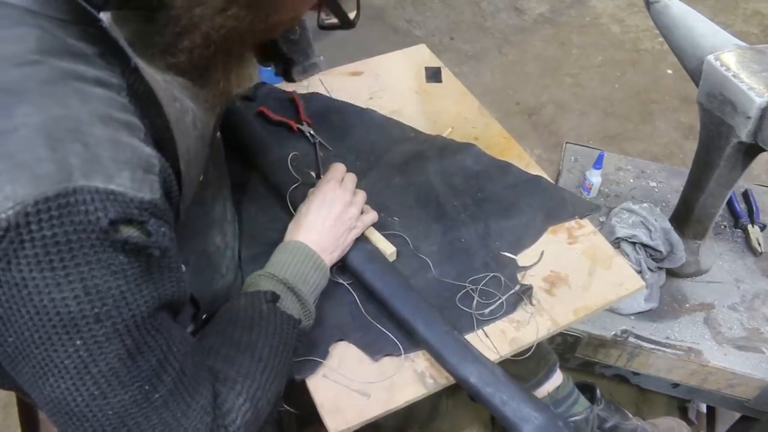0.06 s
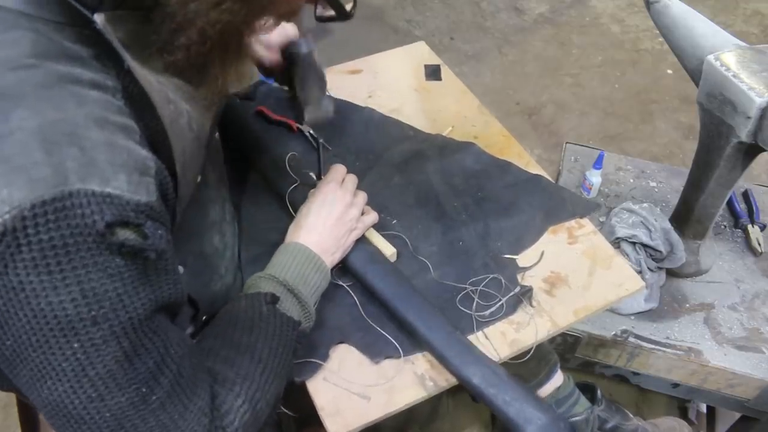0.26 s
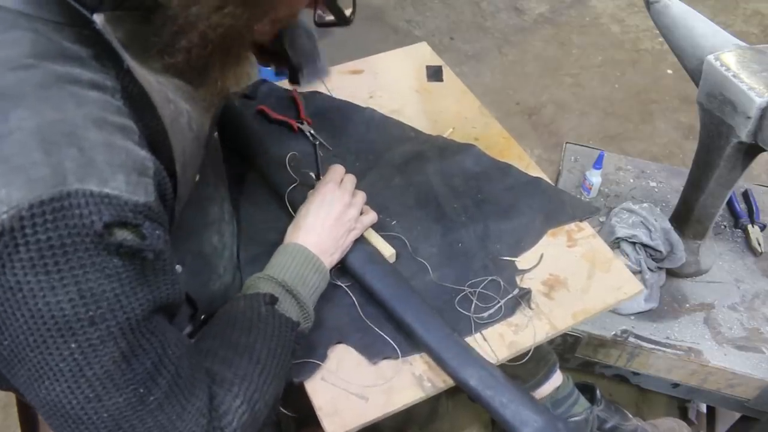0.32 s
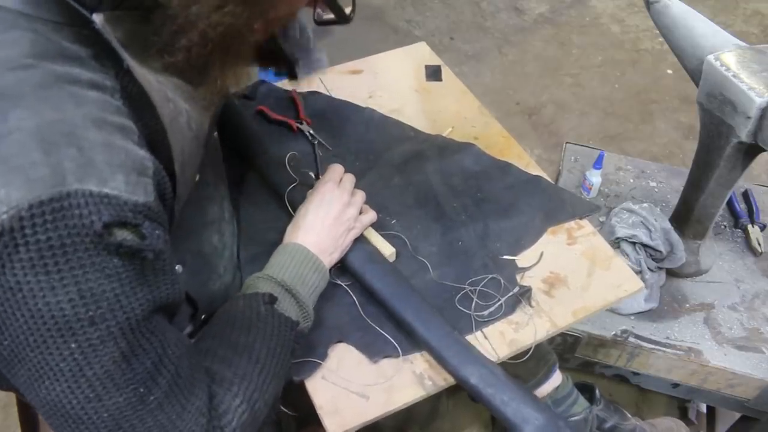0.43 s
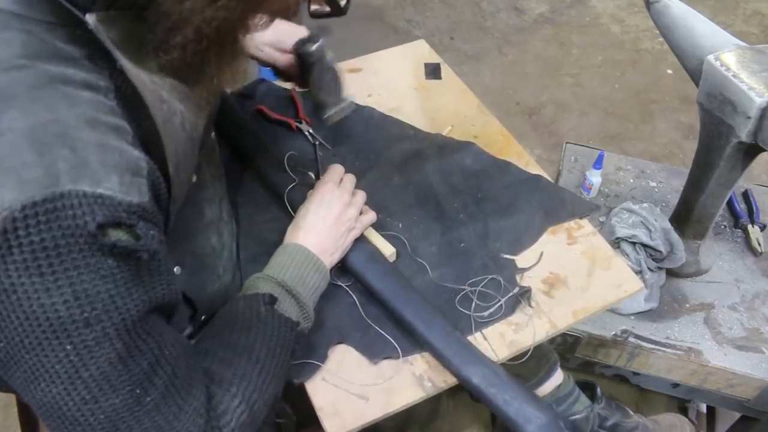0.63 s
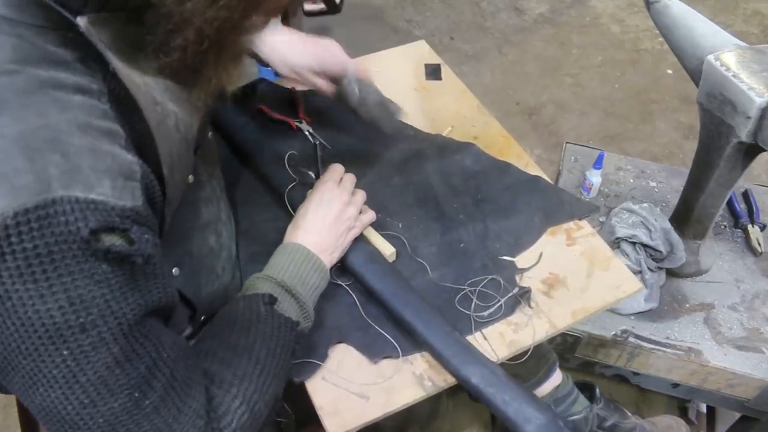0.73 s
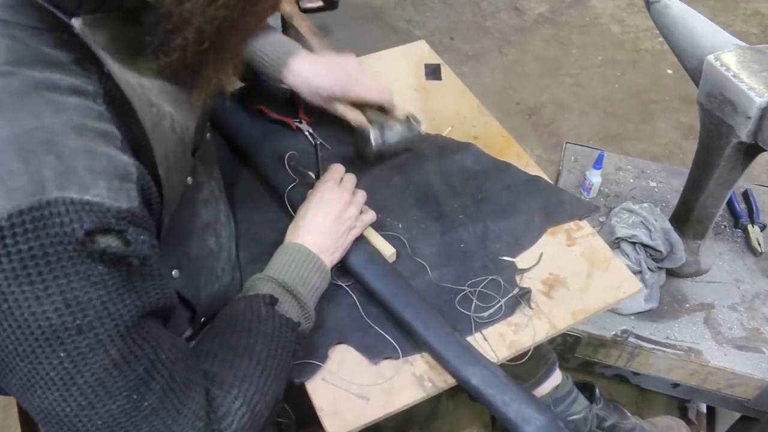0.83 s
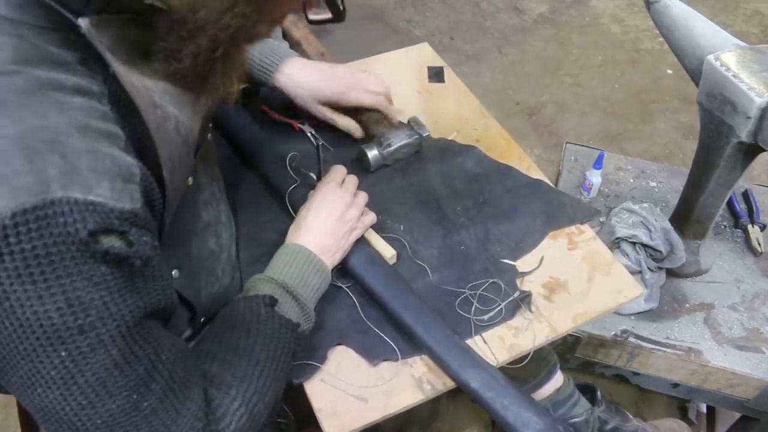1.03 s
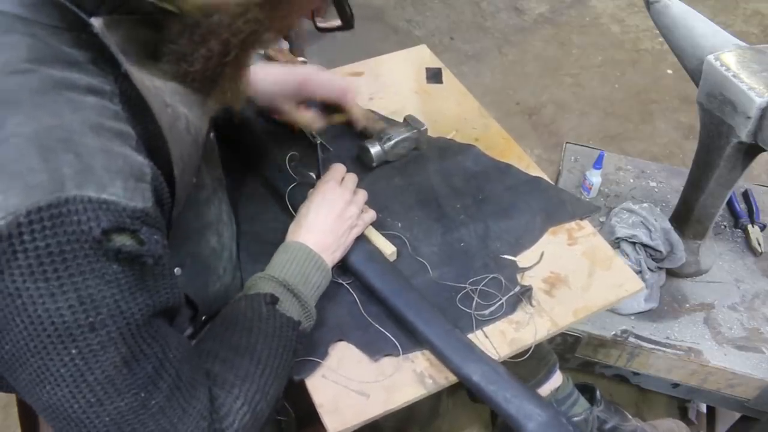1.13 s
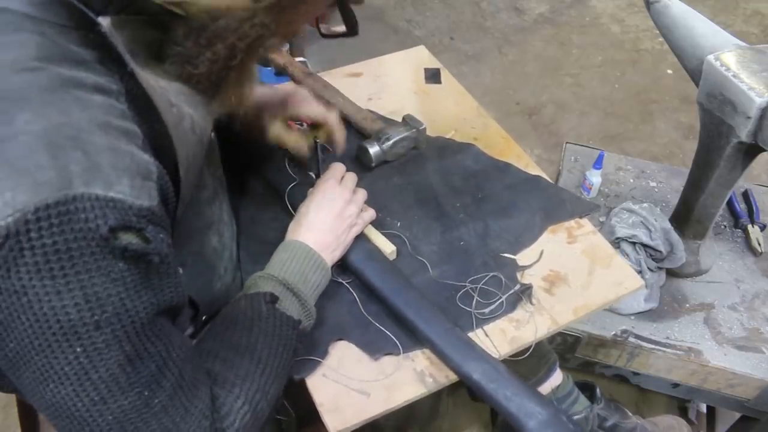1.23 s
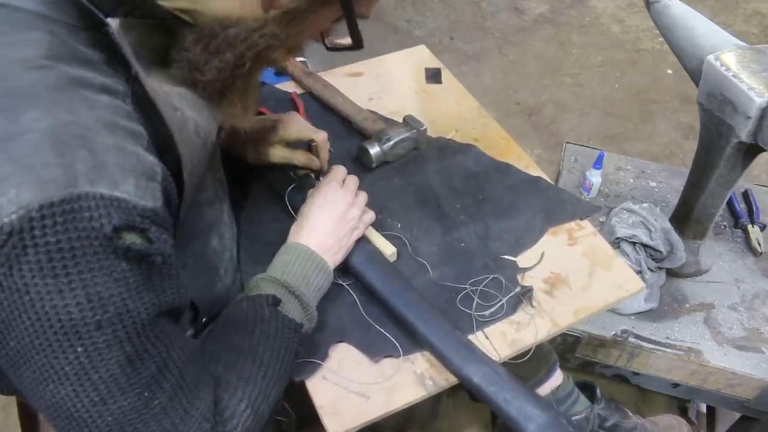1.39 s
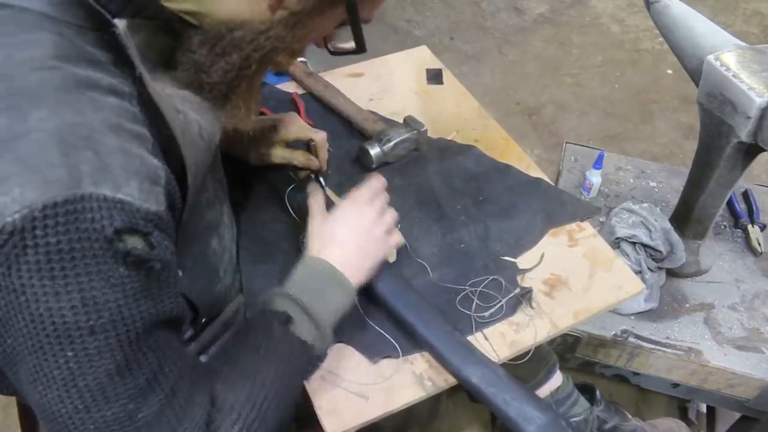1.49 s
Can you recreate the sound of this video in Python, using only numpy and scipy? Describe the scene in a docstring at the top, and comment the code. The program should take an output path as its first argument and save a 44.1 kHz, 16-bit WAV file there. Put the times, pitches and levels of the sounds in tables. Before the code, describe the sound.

A steel hammer strikes leather on a wooden bench at about 0.2 and 0.6 seconds, close and slightly overloaded, each sharp crack ringing briefly in a hard-walled workshop. The second blow bounces softly. Around 0.9 seconds the hammer is laid down with two quick dull thuds and faint ticks. A tool gives a hollow wooden knock at 1.2 seconds, while hands brush the leather very faintly until about 1.5 seconds.

```python
"""A hard-walled workshop, the microphone close to a wooden bench where a steel hammer taps a leather cover.
Each blow is a push, a crack and the bench's short ring. The hammer is laid down with two dull thuds,
a tool knocks on the bench, and hands brush the leather.
The blows overload the recorder: its gain ducks and recovers, which holds the room's echo up."""
import sys
import numpy as np
from scipy import signal
from scipy.fft import rfft, irfft, next_fast_len
from scipy.io import wavfile
from scipy.ndimage import minimum_filter1d

SR = 44100
rng = np.random.default_rng(int(sys.argv[2]) if len(sys.argv) > 2 else 0)


def wrap_up_sound(samples):
    """Save the sound to the file named by the first command line argument, as 16-bit audio."""
    columns = np.atleast_2d(samples).T
    # keep every value between -1 and 1, then stretch to whole-number steps
    tamed = np.clip(columns, -1, 1)
    steps = np.round(tamed * 32767).astype(np.int16)
    wavfile.write(sys.argv[1], SR, steps)


N = 68355

# The struck bench's modes. Each row: frequency in Hz, level in dB, t60 in seconds.
BENCH_MODES = [(233, -16.5, 0.045), (394, -16.5, 0.034), (562.4, -14.5, 0.11), (750, -9.5, 0.032),
               (970, -14.5, 0.058), (1310, -18, 0.013), (2577, -10.5, 0.015), (2830, -24, 0.0087),
               (3680, -11.5, 0.015), (3990, -10.5, 0.013), (6574, -18, 0.014)]
HARD_RISE_S, KNOCK_RISE_S, SOFT_RISE_S = 0.00023, 0.00061, 0.00097  # how fast a contact builds


def hammer_blows():
    """Close up, each blow is a push and spring-back of the leather, a sharp crack and the bench's ring."""
    # The blows; of the first, only the room's ring is heard. Each row: start in seconds, level in dB,
    # tilt of the tail in dB per octave, steel zing in Hz, its level in dB.
    blows = [(-0.117, 0.5, -2.5, 11400, -70), (0.2204, 10, 1.5, 11700, -50),
             (0.5577, 12.5, 0.27, 12800, -51)]
    # Spectra of the hammer face's crack and of the room's answer. Each row: frequency in Hz, level in dB.
    face_colour = [(200, -43), (700, 17), (1300, 6.5), (1750, -6), (2600, 5.5), (3800, -4.5), (5000, -0.5),
                   (7000, -4.5), (9000, -7.5), (12500, -6), (16000, -36)]
    echo_colour = [(50, -15), (100, -7.5), (150, 5.5), (380, 4), (600, -1.5), (1000, -6.5), (1700, -9),
                   (2500, -10.5), (4000, -13.5), (7000, -22.5), (9000, -37), (12500, -30.5), (16000, -52)]
    push_s = 0.00075
    u = clock() / push_s
    push = u * (1 - u * u / 2) * np.exp(1 - u * u / 2) / 2
    body = push + ring(BENCH_MODES)
    out = 0
    for start, db, tilt_db, zing_hz, zing_db in blows:
        blow = body + amp(-4) * crack(face_colour, HARD_RISE_S)
        in_room = workshop(blow, echo_colour, tail_db=-16, tilt_db=tilt_db)
        out = out + amp(db) * delayed(in_room + amp(zing_db) * steel_zing(zing_hz), start)
    return out


def steel_zing(hz, width_hz=400):
    """A narrow, very high band from the steel that hangs in the room."""
    band = filtered(rng.standard_normal((2, N)), lambda f: np.exp(-((f - hz) / width_hz) ** 2 / 2))
    return unit(band) * fade(clock(), t60=0.34)


def hammer_rebounds():
    """The hammer bounces softly on the leather after the last blow."""
    # The bounces. Each row: start in seconds, level in dB.
    bounces = [(0.578, -1), (0.5876, 4)]
    # Their dull clap. Each row: frequency in Hz, level in dB.
    clap_colour = [(200, -10), (500, -1), (1000, 2), (1600, -9), (3000, -15), (6000, -21), (15000, -48)]
    bench = dulled(ring(BENCH_MODES), corner_hz=600)
    out = 0
    for start, db in bounces:
        out = out + amp(db) * delayed(bench + amp(-3.5) * crack(clap_colour, SOFT_RISE_S), start)
    return out


def laying_down():
    """Head and handle land on the padded bench: soft pushes that stir only its lowest modes."""
    # The landings. Each row: time in seconds, level in dB, contact width in seconds.
    thuds = [(0.9143, -1, 0.001), (0.949, -7, 0.00092)]
    # The bench's low ring. Each row: frequency in Hz, level in dB, t60 in seconds.
    low_modes = [(162.6, -20, 0.15), (303, -14, 0.056)]
    # The room's answer. Each row: frequency in Hz, level in dB.
    echo_colour = [(50, -16), (100, -5.5), (165, 2.5), (250, -2.5), (400, -11), (700, -25), (1100, -31.5),
                   (2500, -39.5), (8000, -56.5)]
    out = 0
    for time, db, width in thuds:
        u = (clock() - time) / width
        push = (u * u - 1) * np.exp(-u * u / 2)
        in_room = workshop(ring(low_modes), echo_colour, tail_db=-19.5)
        out = out + amp(db) * (push + delayed(in_room, time))
    return out


def tool_knock(start_s=1.1807):
    """A tool meets the bench: a hollow wooden knock with a duller crack."""
    # The knocked wood's modes. Each row: frequency in Hz, level in dB, t60 in seconds.
    wood_modes = [(372, 2, .036), (532, -7, 0.039), (710, -5.5, 0.019), (958, -9, 0.016),
                  (1720, -19, 0.0084), (2054, -10.5, 0.01), (3180, -10, 0.009)]
    # Spectra of the crack and of the room's answer. Each row: frequency in Hz, level in dB.
    crack_colour = [(300, -22), (1000, 12), (2000, 0), (3500, -1.5), (5000, -22.5), (8000, -28),
                    (15000, -48)]
    echo_colour = [(60, -12), (150, 0), (340, 4), (600, -2.5), (1000, -2.5), (2000, -13), (3500, -23.5),
                   (6000, -33.5), (9000, -58), (15000, -62)]
    wood = ring(wood_modes) * rise(KNOCK_RISE_S)
    knock = low_cut(wood + amp(-6) * crack(crack_colour, KNOCK_RISE_S), corner_hz=253)
    return amp(4) * delayed(workshop(knock, echo_colour, tail_db=-21), start_s)


def tool_touches():
    """Tools touch lightly, each with a faint tick and one short tone."""
    # The touches. Each row: start in seconds, level in dB, ring in Hz.
    touches = [(0.9, -34, 1018), (0.919, -36, 1015), (0.947, -35, 1100), (1.105, -49.5, 1310),
               (1.157, -51, 2300)]
    # Their dull tick. Each row: frequency in Hz, level in dB.
    tick_colour = [(300, -2), (1100, 3), (2500, 4), (5000, -12), (8000, -32), (15000, -49)]
    t60, out = 0.075, 0
    for start, db, hz in touches:
        tone = ring([(hz, 0, t60)]) * rise(SOFT_RISE_S)
        out = out + amp(db) * delayed(tone + amp(4) * crack(tick_colour, SOFT_RISE_S), start)
    return out


def hand_brushes():
    """Hands slide over the leather in brief swells of hiss."""
    # The strokes. Each row: middle in seconds, width in seconds, level in dB.
    strokes = [(0.947, 0.017, -59), (1.049, 0.021, -61), (1.107, 0.021, -52), (1.48, 0.016, -60)]
    # The rubbed leather's hiss. Each row: frequency in Hz, level in dB.
    hiss_colour = [(300, -4), (1500, 11), (4000, 4.5), (8000, 0.5), (15000, -10.5)]
    swells = sum(amp(db) * np.exp(-((clock() - mid) / width) ** 2 / 2) for mid, width, db in strokes)
    return swells * unit(noise(hiss_colour))


def workshop(x, colour, tail_db, tilt_db=0):
    """The direct sound, dull early echoes, then a diffuse tail and the room's low resonances."""
    # Echoes off nearby surfaces. Each row: delay in seconds, level in dB.
    walls = [(.0040, -11.5), (.0104, -13.5), (0.015, -29), (.0212, -27), (.0312, -43)]
    # The tail's decay. Each row: frequency in Hz, t60 in seconds.
    decay = [(100, 0.57), (300, 0.81), (600, 0.49), (2000, 0.57), (5000, 0.44), (8000, 0.37), (14000, 0.24)]
    # The room's resonances. Each row: frequency in Hz, level in dB, t60 in seconds.
    room_modes = [(91, -23, 1), (144.6, -20.5, 0.72), (164.9, -16, 0.62), (364, -12.5, 0.74),
                  (404.2, -9.5, 0.5), (570, -16, 0.52)]
    t, build_s = clock(), 0.0038
    hz, frame_s, bands = signal.stft(unit(noise(colour)), SR, nperseg=512)
    dying = bands * fade(frame_s, along(decay, hz)[:, None])
    tail = signal.istft(dying, SR, nperseg=512)[1][:, :N]
    for mode_hz, db, t60 in room_modes:
        tone = np.sin(2 * np.pi * (mode_hz * t + rng.random()))
        tail = tail + amp(db + along(colour, mode_hz)) * fade(t, t60) * tone
    tail = filtered(tail, lambda f: amp(tilt_db * np.log2(1 + f / 1000)))  # tilts the treble
    tail *= 1 - np.exp(-t / build_s)
    reflected = dulled(x, corner_hz=1460)
    echoes = sum(amp(db) * delayed(reflected, delay) for delay, db in walls)
    return x + echoes + amp(tail_db) * tail


def room_tone():
    """The quiet of the workshop: a faint, steady rumble and hiss."""
    # Its spectrum. Each row: frequency in Hz, level in dB.
    colour = [(25, 10), (100, 1.5), (300, -15), (600, -4), (2000, -16.5), (6000, -21), (15000, -27.5)]
    return amp(-51) * unit(noise(colour))


def crack(colour, rise_s, pan_db=1.5):
    """The brief noise of a contact, slightly left of the microphone."""
    return unit(noise(colour)) * rise(rise_s) * fade(clock(), t60=0.014) * amp([[pan_db], [-pan_db]])


def ring(modes):
    """A sum of dying modes."""
    t = clock()
    return sum(amp(db) * fade(t, t60) * np.sin(2 * np.pi * hz * t) for hz, db, t60 in modes)


def noise(colour):
    """Coloured stereo noise, alike in the bass and unrelated in the treble."""
    # Likeness of left and right at the microphone. Each row: frequency in Hz, correlation.
    likeness = [(100, 1), (400, .98), (1000, 0.87), (2000, 0.66), (4000, 0.1), (10000, 0.033)]

    def mid_side_gains(hz):
        angle = np.arccos(np.clip(along(likeness, hz), -1, 1)) / 2
        return amp(along(colour, hz)) * np.array([np.cos(angle), np.sin(angle)])

    mid, side = filtered(rng.standard_normal((2, N)), mid_side_gains)
    return np.array([mid + side, mid - side])


def rise(rise_s):
    """A smooth start."""
    return 1 - np.exp(-(clock() / rise_s) ** 2)


def fade(t, t60):
    """Dies by 60 dB in t60 seconds."""
    return np.exp(-np.log(1000) * t / t60)


def filtered(x, response):
    """x times a response of frequency."""
    size = next_fast_len(x.shape[-1] + SR // 4)
    return irfft(rfft(x, size) * response(np.fft.rfftfreq(size, 1 / SR)), size)[..., :x.shape[-1]]


def dulled(x, corner_hz):
    """First-order low-pass."""
    return filtered(x, lambda hz: 1 / (1 + 1j * hz / corner_hz))


def low_cut(x, corner_hz):
    """Second-order high-pass."""
    return signal.sosfilt(signal.butter(2, corner_hz, "highpass", fs=SR, output="sos"), x)


def delayed(x, start_s):
    """x moved to begin at start_s."""
    i = N - int(round(start_s * SR))
    return np.pad(x, [(0, 0)] * (x.ndim - 1) + [(N, N)])[..., i:i + N]


def along(points, hz):
    """(Hz, value) points read on a log axis."""
    freqs, values = np.transpose(points)
    return np.interp(np.log(hz + 1), np.log(freqs + 1), values)


def amp(db):
    """Decibels to gain."""
    return 10 ** (np.asarray(db) / 20)


def unit(x):
    """Scaled to rms 1."""
    return x / np.sqrt(np.mean(x ** 2) + 1e-20)


def clock():
    """The time of each sample."""
    return np.arange(N) / SR


def scene():
    """The bench work, close up, over the quiet of the room."""
    hammer = hammer_blows() + hammer_rebounds() + laying_down()
    return hammer + tool_knock() + tool_touches() + hand_brushes() + room_tone()


def record(dry):
    """The recorder's gain ducks just too late, so the attacks clip; it holds, then climbs back steadily."""
    limit_db, attack_s, hold_s, recover_db_per_s = -1, 0.0018, 0.038, 119.5
    mic = low_cut(dry, corner_hz=86)
    over_db = np.maximum(20 * np.log10(np.abs(mic).max(0) + 1e-9) - limit_db, 0)
    half_hold = int(hold_s * SR / 2)
    held_db = -minimum_filter1d(-over_db, 2 * half_hold + 1, origin=half_hold)
    climb_db = recover_db_per_s * clock()
    duck_db = np.maximum.accumulate(held_db + climb_db) - climb_db
    pole = np.exp(-1 / (attack_s * SR))
    late_duck_db = signal.lfilter([1 - pole], [1, -pole], duck_db)
    clipped = np.clip(mic * amp(-late_duck_db), -1, 1)
    return filtered(clipped, lambda hz: 1 / (1 + (hz / 16000) ** 80))  # steep cut above 16 kHz


dry = scene()
out = record(dry)
wrap_up_sound(out)
```